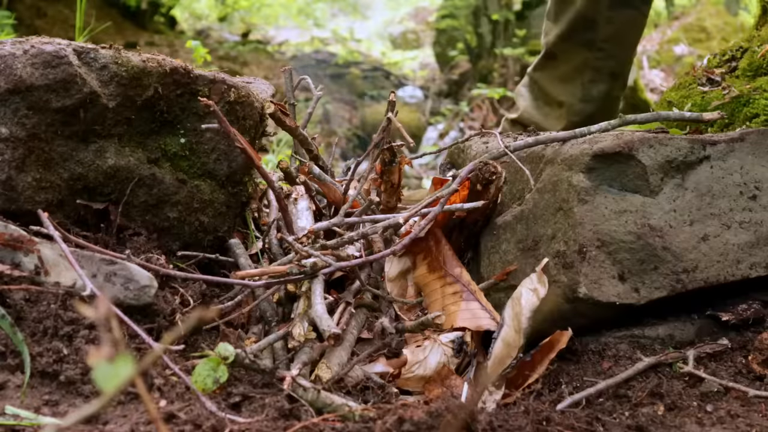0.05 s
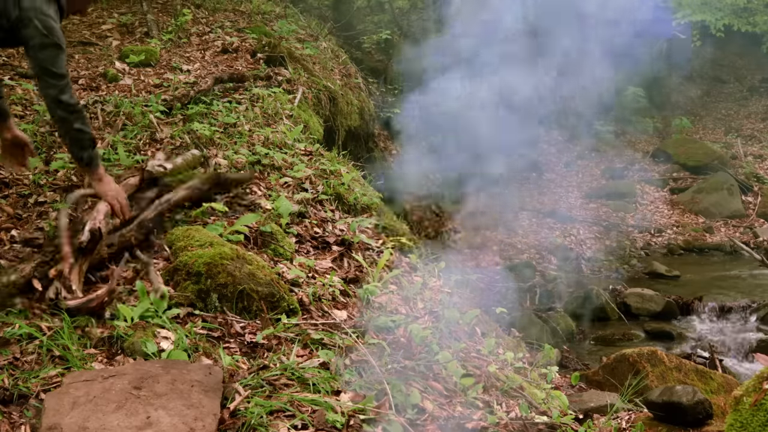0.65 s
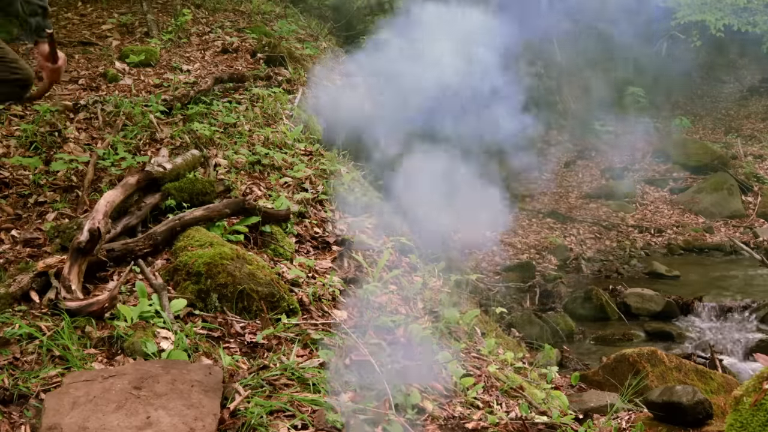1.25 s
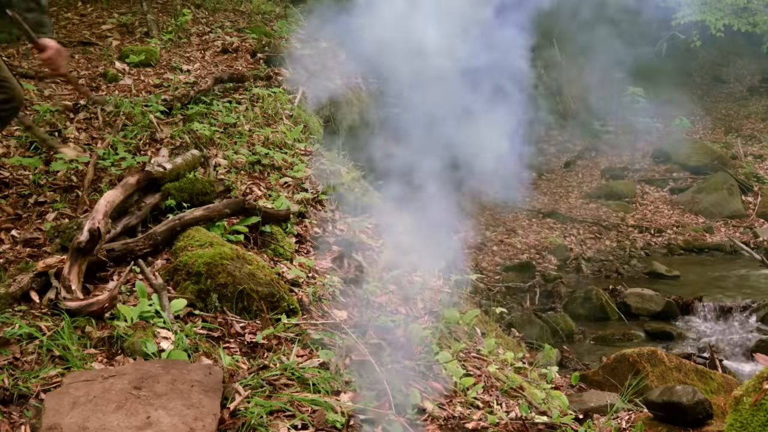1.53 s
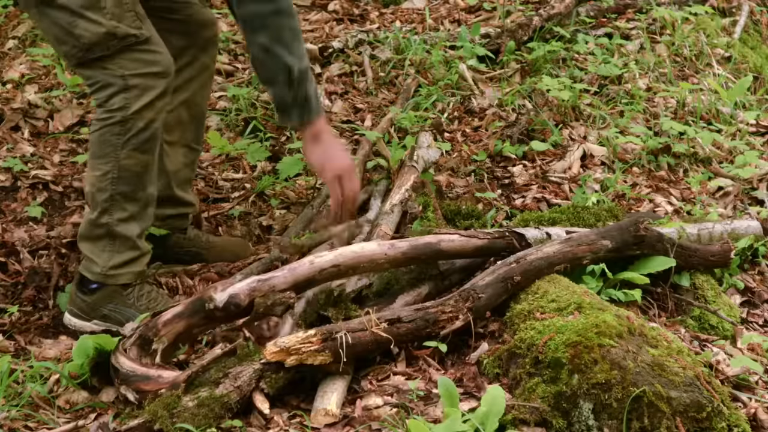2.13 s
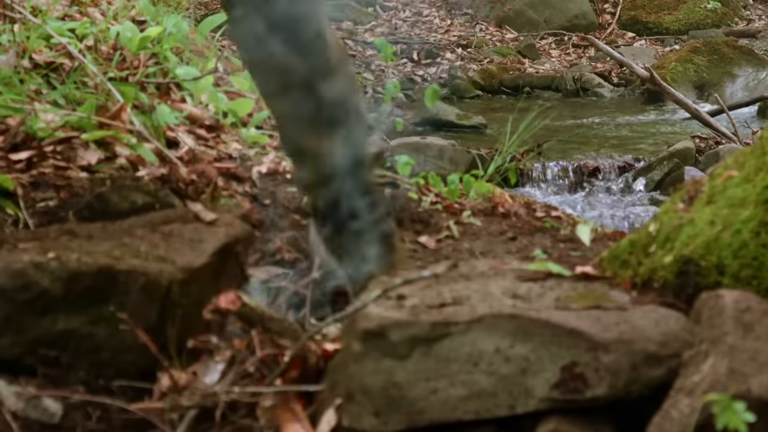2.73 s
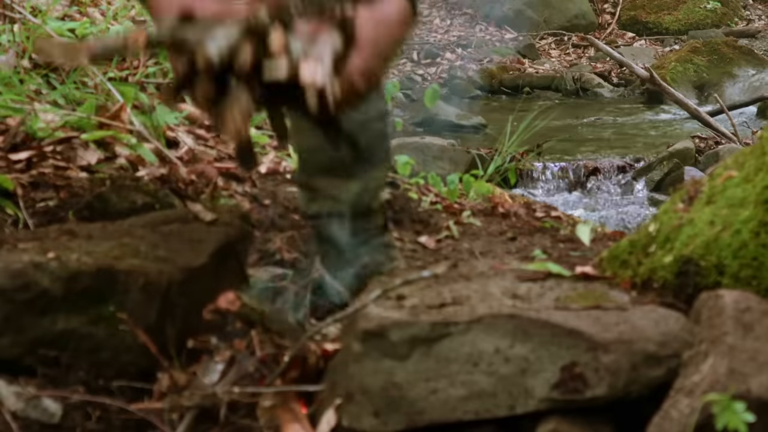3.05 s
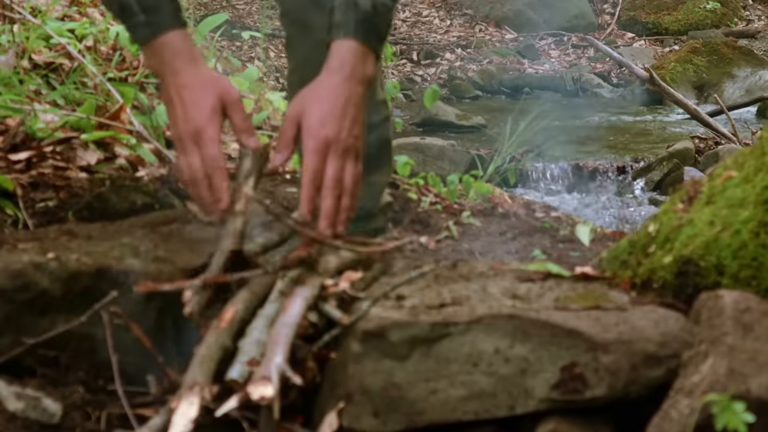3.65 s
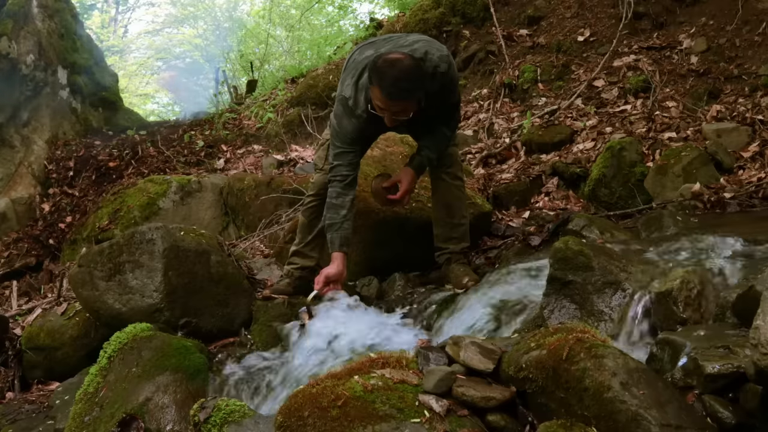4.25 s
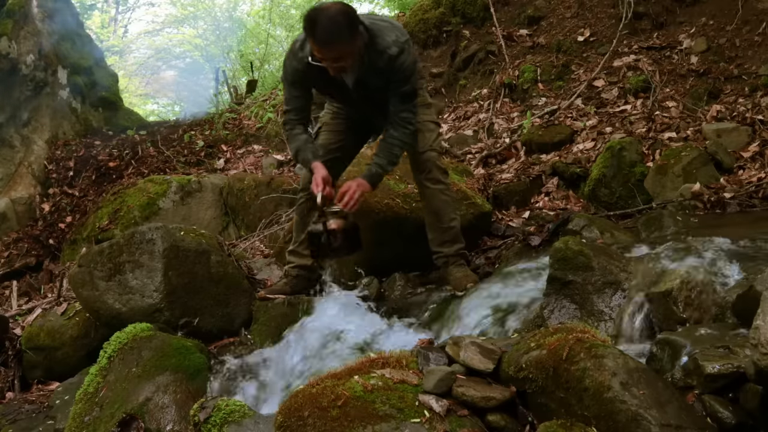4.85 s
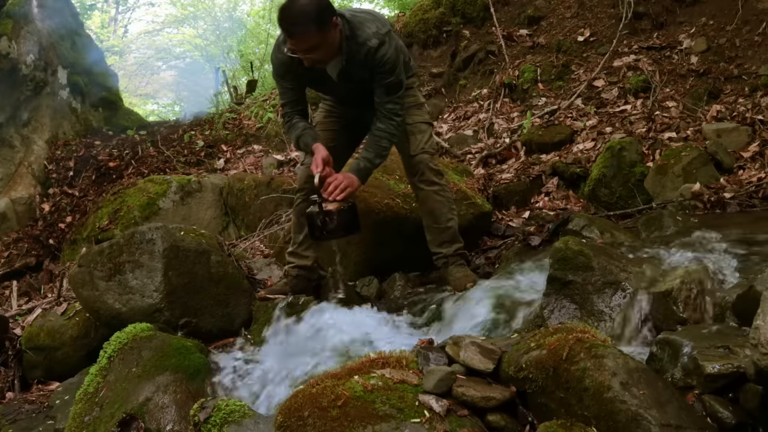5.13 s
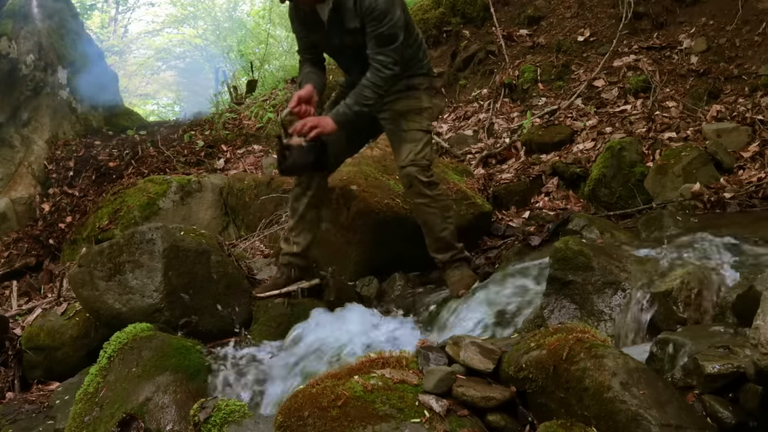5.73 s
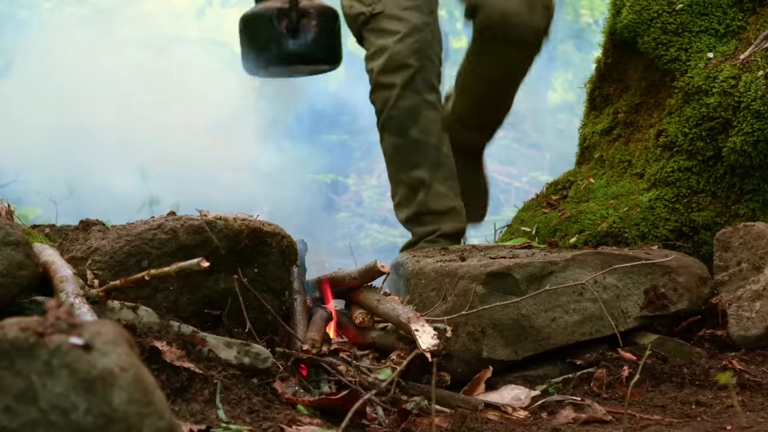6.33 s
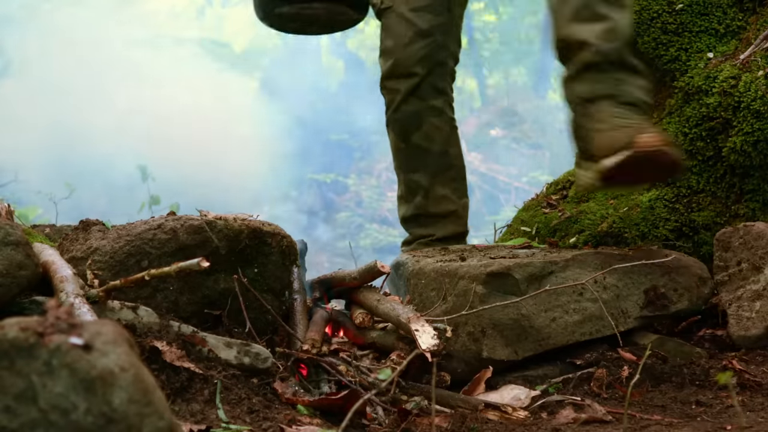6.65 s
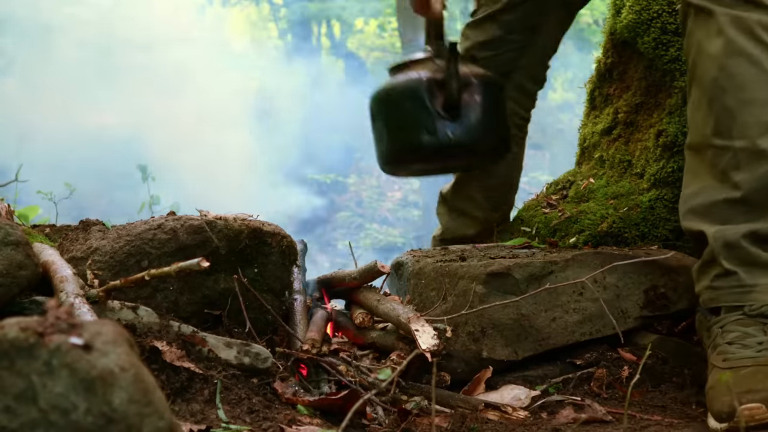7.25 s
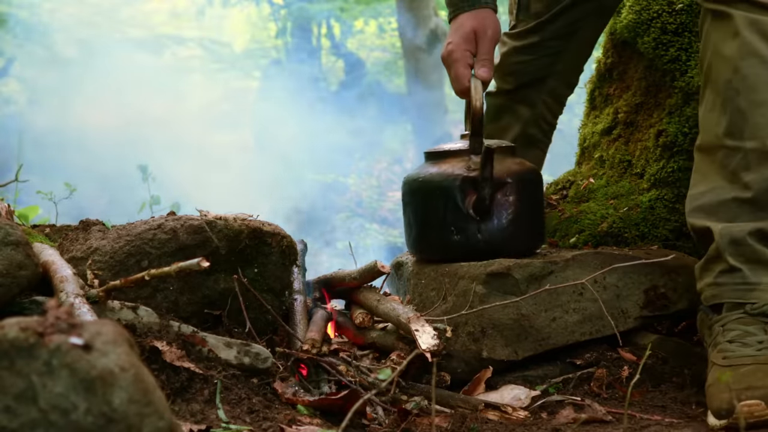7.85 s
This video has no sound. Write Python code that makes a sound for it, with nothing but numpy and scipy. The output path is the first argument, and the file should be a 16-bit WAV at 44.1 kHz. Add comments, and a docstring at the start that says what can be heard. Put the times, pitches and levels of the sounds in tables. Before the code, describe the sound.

Footsteps in dry leaves, cracking firewood and a clunking full kettle, over a babbling brook, a briefly loud cascade and whistling birds.

```python
"""Boots thud on hollow forest ground as someone tends a camp beside a stream.
Twigs snap and branches drop on the firewood pile, each ringing briefly, and dry leaves rustle.
A kettle clunks as it is filled at a small cascade, then is set down on a stone.
The water is a crowd of ringing bubbles over hissing spray; small birds whistle behind it all."""
import sys
import numpy as np
from scipy import signal
from scipy.fft import rfft, irfft
from scipy.io import wavfile
from scipy.ndimage import uniform_filter1d

SR = 44100
rng = np.random.default_rng(int(sys.argv[2]) if len(sys.argv) > 2 else 0)


def wav_record(signal):
    """Record a signal, one row per channel, as 16-bit PCM in the file named by sys.argv[1]."""
    frames = np.transpose(np.atleast_2d(signal))
    bounded = np.clip(frames, -1, 1)
    # unit amplitude maps onto the largest positive 16-bit level
    quanta = np.round(bounded * 32767).astype(np.int16)
    wavfile.write(sys.argv[1], SR, quanta)


N = 357210
TIME = np.arange(N) / SR
AGE = TIME[:SR // 2]   # seconds since a hit


# boot landings: (time [s], relative thump level [dB], thump pitch [Hz], ground boom level [dB])
FOOTSTEPS = [(.677, -9, 166, -36), (.694, -3.5, 152, 0), (0.92, -14, 85, -12), (2.304, -27.5, 150, -25),
             (2.397, -19, 108, -24.5), (3.323, -18, 124.5, -22), (6.186, -9, 181, -8.5),
             (6.983, -1, 350, -20), (6.994, -1.5, 129, -7), (7.493, -23.5, 290, -51),
             (8.063, -20.5, 108, -19.5)]
def boots():
    """A heel thumps and the weight follows; then the hollow ground booms with two close tones."""
    out = np.zeros(N)
    boom = ringing([(89.4, 0.96, 0.29), (106.3, -2.6, 0.27)])
    boom = boom / np.abs(boom).max()
    weight = ringing([(51, -12.5, 0.32)])
    for s, thump_db, hz, boom_db in FOOTSTEPS:
        thump = -np.sin(2 * np.pi * hz * AGE) * fade(7 / hz) * (1 - np.exp(-AGE * hz * 4))
        grit = crunch(0.13) * (1 - np.exp(-AGE * 100))
        grit = hit_one(filtered(grit, [130, 400], "band", order=1))
        add(out, s, from_db(thump_db + 7.5) * thump + from_db(boom_db) * weight)
        add(out, s - .012, from_db(thump_db - 14) * filtered(grit, 2850, "low"))   # grit is hit first
        add(out, s + .025, from_db(boom_db) * boom)
    return out


# twigs breaking: (time [s], level [dB], pitch [Hz], fade time [s], crack compared with ring [dB])
TWIG_SNAPS = [(0.487, -30, 2970, 0.004, -7), (1.312, -39.5, 3360, 0.013, 14), (1.339, -23, 3400, 0.016, 14),
              (1.4014, 2, 3257, 0.0083, -2), (1.629, -35.5, 2660, 0.045, -2),
              (1.717, -28.5, 2560, 0.057, -8), (1.932, -29, 4000, 0.0023, -16),
              (2.346, -33.5, 3950, 0.012, 28), (2.598, -39, 3000, 0.023, 5),
              (2.911, -30.5, 4300, 0.013, 26), (3.290, -34.5, 2640, 0.023, 10),
              (3.349, -22.5, 3000, 0.015, -14), (6.984, -28.5, 2350, 0.049, 5)]
# tones of a broken twig: (pitch [x snap pitch], level [dB], fade time [x snap fade time])
TWIG_TONES = [(.42, -9, 1), (1, 0, 1), (1.15, 0, .6), (1.8, -12, .9), (3.1, -11, .8)]
def twigs():
    """Fibres tear in a burst and the broken ends ring briefly."""
    out = np.zeros(N)
    for s, db, hz, fade_s, crack_db in TWIG_SNAPS:
        tones = [(hz * ratio, level, fade_s * share) for ratio, level, share in TWIG_TONES]
        ends = struck(tones, contact_s=.007, chatter=.9)
        crack = hit_one(filtered(crunch(fade_s), [900, 10000], "band", order=1))
        add(out, s, from_db(db) * hit_one(ends + from_db(crack_db) * crack))
    return out


# branches hitting wood: (time [s], level [dB], lowest pitch [Hz], bark compared with ring [dB])
BRANCH_KNOCKS = [(0.669, -23.5, 945, -12), (1.402, -20, 606, 4.5), (1.449, -29.5, 1110, -35),
                 (1.498, -12.5, 650, -45), (1.529, -23, 1000, -31), (1.728, -25, 283, -36),
                 (2.238, -35, 690, -6.5), (2.299, -14.5, 686, -45), (2.836, -22.5, 257, -12),
                 (3.313, -26, 764, -9), (3.324, -17, 907, -26), (3.343, -16.5, 1080, -22),
                 (3.35, -19.5, 746, -9), (3.396, -26, 440, -32), (3.414, -26, 640, -22),
                 (3.431, -27.5, 540, -11.5)]
# tones of a branch: (pitch [x lowest pitch], level [dB], fade time [s])
BRANCH_TONES = [(1, 4, 0.037), (1.62, -9, .03), (2.2, -2.5, 0.031), (2.56, -6, 0.034), (3.8, -30.5, .02)]
def branches():
    """Each branch rings at its own pitch while its bark splinters."""
    out = np.zeros(N)
    for s, db, hz, bark_db in BRANCH_KNOCKS:
        tones = [(hz * ratio, level, fade_s) for ratio, level, fade_s in BRANCH_TONES]
        wood = struck(tones, contact_s=.018, chatter=.5)
        thud = hit_one(filtered(crunch(.045), [200, 1900], "band"))
        bark = hit_one(filtered(crunch(.032), [1400, 5500], "band"))
        add(out, s, from_db(db) * (wood + from_db(-2.5) * thud + from_db(bark_db) * bark))
    return out


# kettle bumped and its lid pressed on: (time [s], level [dB], scrape compared with ring [dB])
KETTLE_BUMPS = [(4.974, -12.5, -12), (4.993, -11, -15), (5.123, -18, -10), (5.369, -16, -9),
                (5.526, -8, -1.5)]
# tones of the kettle in the hand: (pitch [Hz], level [dB], fade time [s])
HELD_TONES = [(349, -2.5, 0.086), (485, 7, 0.051), (623, -5.5, 0.094), (1426, -9.5, 0.068),
              (1670, -10, 0.046), (3000, -26, 0.011)]
# full kettle meeting the stone: (time [s], level [dB], grit compared with ring [dB])
STONE_HITS = [(7.724, -13, -24), (7.732, -27, -3), (7.917, -24, -17.5), (8.064, -25.5, -14)]
# tones of the full kettle: (pitch [Hz], level [dB], fade time [s])
FULL_TONES = [(199, 2.5, 0.044), (294.5, 0, 0.12), (467, 1, 0.068), (680, -2, 0.069), (880, 3.5, 0.013),
              (1290, 0.5, 0.022)]
def kettle():
    """Water dulls the kettle's ring to a clunk; touches are soft in the hand and hard on stone."""
    out = np.zeros(N)
    soft_start = 1 - np.exp(-(AGE / 0.002) ** 2)
    for s, db, scrape_db in KETTLE_BUMPS:
        scrape = filtered(crunch(0.12), [900, 4200], "band", order=1)
        scrape = hit_one(filtered(scrape, 6900, "low"))
        body = struck(HELD_TONES, contact_s=0.036, chatter=1.7)
        add(out, s, from_db(db) * hit_one(soft_start * (body + from_db(scrape_db) * scrape)))
    for s, db, grit_db in STONE_HITS:
        grit = hit_one(filtered(crunch(0.14), [1500, 4500], "band"))
        body = struck(FULL_TONES, contact_s=0.21, chatter=0.94)
        add(out, s, from_db(db) * (body + from_db(grit_db) * grit))
    return out


# a foot or stick pushing through dry leaves: (time [s], length [s], leaf level [dB], soil level [dB])
LEAF_SHUFFLES = [(0.295, 0.28, -48.5, -44.5), (0.63, 0.12, -35, -38.5), (0.754, 0.35, -41, -40),
                 (0.891, 0.097, -41, -43), (1.425, .27, -37, -47), (1.852, 0.34, -40.5, -38.5),
                 (2.695, 0.37, -42.5, -38), (3.303, 0.25, -39, -36), (6.139, 0.17, -42, -36),
                 (6.944, 0.087, -39, -33.5), (7.418, 0.15, -44, -43.5), (7.966, 0.23, -67, -42)]
# bass-to-treble balance of leaves and of soil: (frequency [Hz], relative level [dB])
LEAF_COLOUR = [(300, -16.5), (1200, 7), (3000, 3), (5000, 2), (9000, -4.5), (15000, -18.5)]
SOIL_COLOUR = [(35, -4.5), (90, -3), (200, -10), (500, -11.5), (3000, -37.5)]
def forest_floor():
    """Each shuffle swells quickly and tails off: leaves crackle in clumps above shifting soil."""
    leaf_gain, soil_gain = np.zeros((2, N))
    for s, length, leaves_db, soil_db in LEAF_SHUFFLES:
        progress = np.linspace(0, 1, int(length * SR))
        swell = np.abs(np.sin(np.pi * progress ** .55)) ** .6
        add(leaf_gain, s, from_db(leaves_db) * swell)
        add(soil_gain, s, from_db(soil_db) * swell)
    cracks = rng.random(N) < 6000 * from_db(6 * drift(60)) / SR
    leaves = coloured(clicks(cracks, spread_db=4.6, cap=5.5), LEAF_COLOUR)
    soil = coloured(rng.standard_normal(N), SOIL_COLOUR)
    return leaf_gain * leaves + soil_gain * soil


# loudness of the near cascade and of the far brook: (time [s], level [dB])
CASCADE_LEVEL = [(4.08, -91.5), (4.095, -30.5), (5.88, -29), (5.895, -65)]
BROOK_LEVEL = [(0, -45.5), (1.05, -47), (1.15, -48), (5.8, -46.5), (5.9, -43), (8.1, -42.5)]
# their bass-to-treble balance: (frequency [Hz], relative level [dB])
CASCADE_COLOUR = [(59, -37), (100, -17), (171, -7), (331, 0), (418, -5.5), (615, 0.5), (2030, -1.5),
                  (11700, -23), (15100, -32.5), (16500, -55)]
BROOK_COLOUR = [(21, -74.5), (35, -38), (93, -13.5), (503, -17), (684, -16), (1140, -14), (2010, -18.5),
                (2950, -22.5), (16000, -41)]
# large bubbles: (time [s], starting pitch [Hz], level [dB])
BIG_BUBBLES = [(.053, 637, -24.5), (7.277, 643, -24.5)]
def stream():
    """The brook babbles far off all the time; the cascade is heard only while close by."""
    brook = water(bubbles_per_s=900, spread_db=6.0, spray=3.5, colour=BROOK_COLOUR)
    brook *= from_db(curve(BROOK_LEVEL))
    cascade = water(bubbles_per_s=1400, spread_db=3.0, spray=1.46, colour=CASCADE_COLOUR)
    cascade *= from_db(curve(CASCADE_LEVEL))
    for s, hz, db in BIG_BUBBLES:
        add(brook, s, from_db(db) * bubble(hz, cycles=43, rise=0.35))
    return brook + cascade


def water(bubbles_per_s, spread_db, spray, colour):
    """Bubbles of all sizes ring and droplets tick over a hiss of spray."""
    bubbles = np.zeros(N)
    for when, smallness, strength in rng.random((int(bubbles_per_s * N / SR), 3)):
        hz = 300 * 20 ** smallness
        loudness = from_db(spread_db * min(-np.log(1 - strength), 4)) * np.sqrt(hz)
        add(bubbles, when * N / SR, loudness * bubble(hz, cycles=27.3, rise=0.28))
    drops = clicks(rng.random(N) < 600 / SR, spread_db=5.0, cap=4.5)
    ticks = from_db(-0.5) * rms_one(filtered(drops, [4000, 14000], "band"))
    return coloured(rms_one(bubbles) + spray * rng.standard_normal(N) + ticks, colour)


def bubble(hz, cycles, rise):
    """A bubble rings briefly and climbs in pitch as it nears the surface."""
    life = AGE[:int(cycles / hz * SR)] * hz / cycles   # runs from 0 to 1
    tone = np.sin(2 * np.pi * cycles * (life + rise * life ** 2 / 2))
    return tone * np.exp(-np.log(1000) * life) * (1 - np.exp(-life * cycles))


# up-and-down whistles, mostly low ones near 2 kHz, one higher: (time [s], length [s], middle pitch [Hz], level
# [dB])
ARCHED_WHISTLES = [(0, 0.16, 2020, -48), (0.349, 0.09, 2255, -40), (0.554, .11, 2220, -42.5),
                   (1.572, 0.14, 2060, -44), (1.871, 0.11, 1970, -40), (2.278, .06, 2446, -41),
                   (5.872, .08, 2080, -41), (6.042, 0.2, 2335, -35.5), (6.653, .09, 2150, -37.5),
                   (6.816, 0.079, 2330, -36), (7.078, 0.055, 4156, -33.5), (8.007, 0.044, 2380, -27)]
# a high bird's sliding notes: (time [s], length [s], start pitch [Hz], end pitch [Hz])
HIGH_SLIDES = [(6.038, 0.079, 3850, 6070), (6.216, .05, 6600, 4400), (6.517, .085, 3900, 6100),
               (7.24, 0.072, 3630, 2950), (7.226, 0.097, 6800, 5100), (7.46, 0.1, 6700, 4140)]
# its short falling chirps: (time [s])
CHIRP_TIMES = [5.986, 6.305, 6.453, 6.734, 6.854, 7.021, 7.767, 7.856]
def near_birds():
    """Nearby birds whistle gliding notes whose loudness flutters."""
    out = np.zeros(N)
    for s, length, hz, db in ARCHED_WHISTLES:
        add(out, s, from_db(db) * whistle(length, .975 * hz, hz, .94 * hz))
    for s, length, start_hz, end_hz in HIGH_SLIDES:
        add(out, s, from_db(-44) * whistle(length, start_hz, np.sqrt(start_hz * end_hz), end_hz))
    for s, shift in zip(CHIRP_TIMES, rng.normal(0, 0.78, len(CHIRP_TIMES))):
        pitches = np.array([7100, 5600, 4500]) * from_db(shift)
        add(out, s - .04, from_db(-49.5) * whistle(.03, *pitches[::-1]))   # a soft rising lead-in
        add(out, s, from_db(-47) * whistle(0.033, *pitches))
    return out * from_db(3.2 * drift(90))


def whistle(length, start_hz, middle_hz, end_hz):
    """A pure tone that swells and glides through three pitches."""
    progress = np.linspace(0, 1, int(length * SR))
    hz = np.polyval(np.polyfit([0, .5, 1], [start_hz, middle_hz, end_hz], 2), progress)
    return np.sqrt(np.abs(np.sin(np.pi * progress))) * np.sin(2 * np.pi * np.cumsum(hz) / SR)


# distant birdsong, one list per phrase: (time [s], pitch [Hz], level [dB])
FAR_PHRASES = [
    [(.15, 2615, -48.5), (.78, 2463, -51), (1.03, 3250, -38.5), (1.085, 3370, -47)],
    [(7.26, 2950, -44.5), (8.0, 2950, -57)],
]
def far_bird():
    """A bird farther off sounds hoarse: its tone is blurred by noise."""
    out = np.zeros(N)
    for phrase in FAR_PHRASES:
        blur = rms_one(filtered(rng.standard_normal(N), 154, "low"))
        singing = (TIME > phrase[0][0]) & (TIME < phrase[-1][0])
        loudness = uniform_filter1d(1. * singing, size=800) * from_db(curve(phrase, column=2))
        out += loudness * blur * np.sin(2 * np.pi * np.cumsum(curve(phrase)) / SR)
    return out


def forest_echo(x, fade_s, echo_db):
    """Trunks and banks scatter the sound into a faint, dull echo."""
    tail = filtered(crunch(fade_s), 3000, "low", order=1) * (1 - np.exp(-AGE / 0.01))
    return x + from_db(echo_db) * signal.fftconvolve(x, tail / np.sqrt(np.sum(tail ** 2)))[:N]


def struck(tones, contact_s, chatter):
    """One clean touch, then the chatter of rough surfaces; both make the object ring."""
    ring = ringing(tones)
    rattle = signal.fftconvolve(crunch(contact_s), ring)[:len(AGE)]
    return hit_one(hit_one(ring) + chatter * hit_one(rattle))


def ringing(tones):
    """Tones (pitch [Hz], level [dB], fade time [s]) start together, every second one flipped."""
    return sum((-1) ** k * from_db(db) * np.sin(2 * np.pi * hz * AGE) * fade(fade_s)
               for k, (hz, db, fade_s) in enumerate(tones))


def crunch(fade_s):
    """A burst of noise that dies away."""
    return rng.standard_normal(len(AGE)) * fade(fade_s)


def fade(fade_s):
    """Die away by 60 dB over the fade time."""
    return from_db(-60 * AGE / fade_s)


def clicks(where, spread_db, cap):
    """A click at each marked sample: most are weak, a few are strong."""
    return where * rng.choice([-1, 1], N) * from_db(spread_db * np.minimum(rng.exponential(1, N), cap))


def coloured(x, colour):
    """Shape a sound's bass-to-treble balance, then set its average level to 1."""
    hz, db = np.transpose(colour)
    bins_hz = np.maximum(np.arange(N // 2 + 1) * SR / N, 1)
    gain = from_db(np.interp(np.log(bins_hz), np.log(hz), db)) * np.minimum(bins_hz / hz[0], 1)
    return rms_one(irfft(rfft(x) * gain, N))


def drift(turns_per_s):
    """A random wander of typical size 1."""
    points = rng.standard_normal(int(N / SR * turns_per_s) + 2)
    return rms_one(np.interp(TIME * turns_per_s, np.arange(len(points)), points))


def filtered(x, hz, kind, order=2):
    """Keep only the lows, or one band of frequencies."""
    return signal.sosfilt(signal.butter(order, hz, kind, fs=SR, output="sos"), x)


def curve(rows, column=1):
    """One column of a table, joined by straight lines in time."""
    rows = np.array(rows)
    return np.interp(TIME, rows[:, 0], rows[:, column])


def add(out, s, sound):
    """Mix a sound in at s seconds."""
    i = max(0, round(s * SR))
    out[i:i + len(sound)] += sound[:max(0, N - i)]


def from_db(db):
    """Turn decibels into a multiplier."""
    return 10 ** (np.asarray(db) / 20)


def rms_one(x):
    """Set the average level (rms) to 1."""
    return x / np.sqrt(np.mean(x ** 2) + 1e-20)


def hit_one(x):
    """Give a hit the energy of 10 ms of sound at average level 1."""
    return x / np.sqrt(np.sum(x ** 2) / (SR / 100))


def scene():
    """Mix everything into one channel; only branches, kettle and birds get an echo."""
    handling = forest_echo(branches() + kettle(), fade_s=.3, echo_db=-25)
    song = forest_echo(near_birds() + far_bird(), fade_s=.4, echo_db=-11)
    return (stream() + boots() + twigs() + forest_floor() + handling + song)[None]


def record(dry):
    """The loudest hits overload, and the highest treble is cut."""
    treble_cut = signal.ellip(10, .1, 70, 16000, fs=SR, output="sos")   # above 16000 Hz
    return signal.sosfilt(treble_cut, np.clip(dry, -1, 1))


dry = scene()
out = record(dry)
wav_record(out)
```